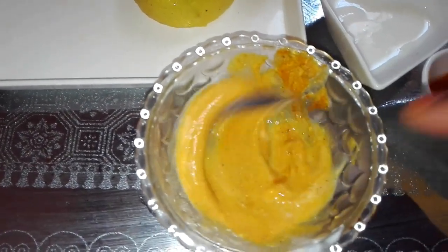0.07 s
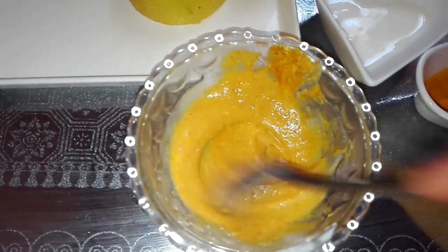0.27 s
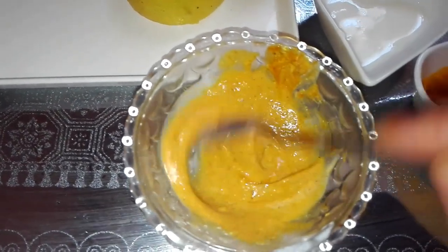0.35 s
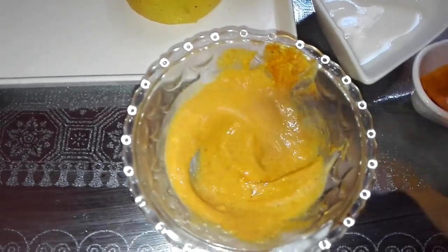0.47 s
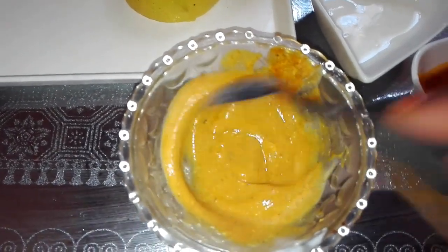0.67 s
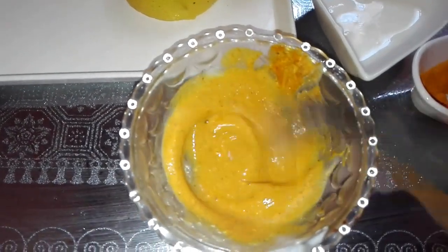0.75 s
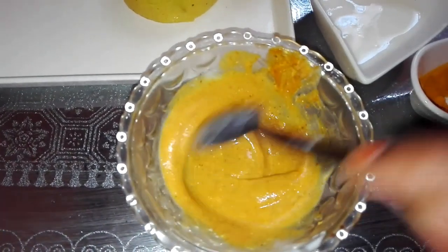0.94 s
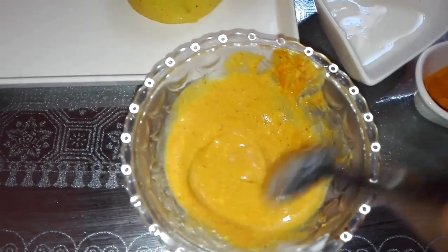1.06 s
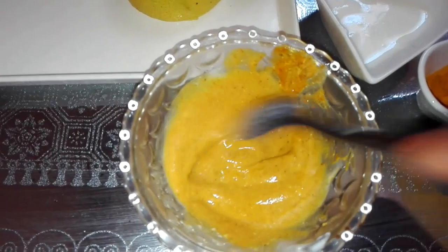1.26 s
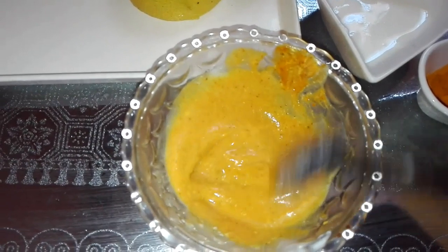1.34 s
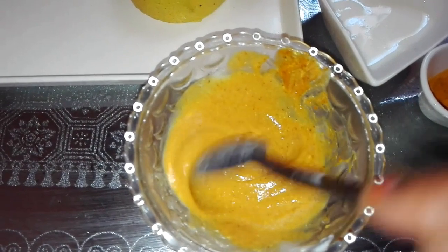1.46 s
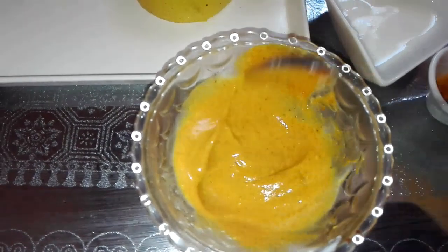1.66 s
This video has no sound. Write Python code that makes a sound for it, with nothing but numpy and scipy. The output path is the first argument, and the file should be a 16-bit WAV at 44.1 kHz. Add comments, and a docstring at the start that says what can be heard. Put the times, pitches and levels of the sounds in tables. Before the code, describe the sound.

A metal spoon stirs thick paste in a glass bowl, with damped clicks and scrapes.

```python
"""A metal spoon stirs thick paste in a small glass bowl, about three and a half turns a second.
It knocks on the glass, which the paste damps at once, stutters along the wall and rings faintly
as it springs free. The paste smears under the spoon and smacks as air pockets open.
A small hard room answers each click. Behind it the bowl rocks on the table, over a faint mains hum."""
import sys
import numpy as np
from scipy import signal
from scipy.io import wavfile

SR = 44100
rng = np.random.default_rng(int(sys.argv[2]) if len(sys.argv) > 2 else 0)


def file_out(sig):
    """Save sig as 16-bit WAV at sys.argv[1]."""
    # one column per channel
    cols = np.atleast_2d(sig).T
    # limit, then scale
    lim = np.clip(cols, -1, 1)
    pcm = np.round(lim * 32767).astype(np.int16)
    wavfile.write(sys.argv[1], SR, pcm)


N = 74970

# A t60 is the time a sound takes to fade by 60 dB. A colour says which pitches are strong or weak.
# the spoon hits the glass: start_s, relative_db, body_db, clink_db, edge_db, thump_db, favoured_hz, lift_db
KNOCK_EVENTS = [(0.4393, -17.5, 2.5, 1, 4.5, 5, 4900, -2.5), (0.5675, -31.5, 3, 4.5, 6.5, 16, 5160, 2.5),
                (0.7297, -15.5, -4.5, -0.5, 2.5, -12, 2260, -1), (1.0191, -25, 2.5, 8.5, 5, 24, 3400, 16),
                (1.2983, -25.5, -3, 1, -5, 16.5, 3920, 18.5), (1.4245, -25, -3.5, 4, 6, 3, 4400, 4)]
# the spoon slips along the wall: start_s, length_s, relative_db, body_db, edge_db
SLIP_EVENTS = [(.0045, 0.0022, -41, 5, 3.5), (.063, 0.0031, -47.5, -23, 4), (.091, 0.0045, -44.5, 7.5, -5),
               (0.132, 0.0045, -43.5, -0.5, -2), (0.2006, 0.0056, -42.5, -9, 6.5),
               (0.2122, 0.0077, -36, 11.5, 10.5), (0.255, 0.0036, -34.5, -9, 6),
               (.275, 0.0034, -35.5, 12.5, 10.5), (0.4473, 0.0044, -33, 2.5, 1.5),
               (0.459, 0.0096, -36.5, -6, 10), (0.4628, 0.0052, -43, 23, -12),
               (0.471, 0.0052, -44.5, 22, 11), (0.5465, 0.0084, -36.5, 6, 1),
               (0.6488, 0.0074, -43, 20.5, 8), (0.7395, 0.0093, -28, 0.5, -4),
               (0.7556, 0.007, -42.5, 13, 7.5), (0.771, 0.0074, -44, 10.5, 14), (0.794, 0.003, -40, 12, 4),
               (0.8077, 0.0011, -40, 17.5, 4.5), (0.842, 0.00044, -43.5, 13, 8),
               (0.86, 0.0013, -42.5, -3, 15), (0.8961, 0.0053, -38.5, 3, 3), (0.912, 0.0034, -42.5, 6.5, 0),
               (1.012, 0.0025, -28.5, -1.5, -8), (1.143, 0.0093, -29, -11, -21),
               (1.1568, 0.0029, -37, 1, -6.5), (1.1739, 0.0017, -33.5, -4, 1.5),
               (1.316, 0.0053, -29.5, -4, -3.5), (1.3302, 0.0063, -30, 6, -0.5),
               (1.3412, 0.0045, -32, -6, -0.5), (1.3568, 0.0067, -41.5, -7, 3),
               (1.389, .007, -42, 2.5, 0.5), (1.411, 0.0068, -28, 2, -5), (1.432, 0.0057, -36, -17.5, 2.5)]
# the spoon springs free: start_s, level_db
SPOON_RELEASES = [(.133, -55), (.149, -49), (0.569, -53)]
# ringing tones of the spoon: pitch_hz, relative_db, t60_s
SPOON_TONES = [(1750, 0, 0.14), (4215, 2.5, 0.15), (7700, -1, 0.041), (11900, -13.5, .09)]
# ringing tones of the filled bowl: pitch_hz, relative_db, t60_s
BOWL_TONES = [(830, -17, 0.028), (1208, -9, 0.018), (1610, -12.5, 0.049), (1841, -5.5, 0.035),
              (2203, 3, 0.012), (2602, -3.5, 0.016), (3475, -2, 0.015), (4050, -2, 0.0037),
              (4812, -3.5, 0.016), (6120, -12.5, 0.014), (6680, -7, 0.0032)]
# colour of the gritty crack in each contact: pitch_hz, gain_db
CRACK_COLOUR = [(120, -31), (500, -15), (1000, 0.5), (3000, -0.5), (6800, -7.5), (8300, -20), (16000, -28)]
# colour of the whole bowl's thump: pitch_hz, gain_db
BOWL_THUMP_COLOUR = [(90, -14), (300, 14.5)]
# air pockets open in the paste: start_s, relative_db
SMACK_EVENTS = [(0.401, -42.5), (0.6859, -46.5), (0.96, -39.5), (1.1844, -34.5), (1.232, -40), (1.636, -40),
                (1.6941, -30)]
# colour of their pops: pitch_hz, gain_db
SMACK_COLOUR = [(550, 1), (1000, 10), (8000, -10.5)]
# paste dragged under the spoon: time_s, level_db
DRAG_LEVELS = [(0, -50.5), (.17, -62.5), (.24, -47.5), (.32, -50.5), (.38, -73), (.43, -63.5), (.47, -40.5),
               (.62, -85), (.68, -43.5), (.72, -63.5), (.77, -44.5), (.94, -59), (1.09, -62.5),
               (1.15, -49.5), (1.28, -80), (1.32, -54), (1.41, -46), (1.48, -82.5), (1.62, -82.5),
               (1.67, -55)]
# colour of the smearing paste: pitch_hz, gain_db
SMEAR_COLOUR = [(200, -7), (400, -2.5), (600, -7.5), (1100, 2.5), (2000, 2.5), (2900, -1.5), (3450, 0.5),
                (4300, -8), (6500, -17), (15000, -32.5)]
# the bowl rocks on the table: time_s, level_db
ROCKING_LEVELS = [(.41, -91), (.445, -48.5), (.62, -82), (.78, -62), (.92, -58.5), (1.17, -54),
                  (1.35, -54.5), (1.5, -80)]
# colour of the table's rumble: pitch_hz, gain_db
RUMBLE_COLOUR = [(35, -21.5), (62, 16), (90, -6), (170, 5.5), (210, -20), (380, -8), (1500, -75)]
# how long the room rings: pitch_hz, t60_s
ROOM_FADE_TIMES = [(700, 0.17), (1700, 0.3353), (3500, 0.2), (9000, 0.4)]
# how much sound the room sends back: pitch_hz, gain_db
ROOM_COLOUR = [(600, -0.5), (1200, -4.5), (2000, -11.5), (2900, -9), (3400, -13), (4200, -20.5)]
# echoes from nearby surfaces: delay_s, gain
NEAR_ECHOES = [(.0019, 0.1), (.0034, 0.062)]
# colour of the room's still air: pitch_hz, gain_db
AIR_COLOUR = [(30, -3.5), (70, 10), (150, 5), (260, -12), (1000, -19.5), (3000, -26), (15000, -29)]

KNOCK_BOOST_DB, SLIP_BOOST_DB, SMACK_BOOST_DB = 23.5, 23.5, 19
THUMP_HZ, THUMP_T60_S, THUMP_DB = 390, 0.015, -39
CRACK_T60_S, CRACK_DB = 0.016, -1.5
BODY_HZ, NEUTRAL_HZ, CLINK_HZ, EDGE_HZ, FAVOUR_OCTAVES = 1082, 2020, 3330, 4500, 0.24
CATCHES_PER_S, SLIP_ENDS_DB = 5000, -0.5  # a slip is a little weaker at both ends
SLIP_CLINK_DB, CLINK_PER_EDGE = 7.5, 0.63  # a sharper slip also clinks more
POP_HZ, POP_PITCH_SPREAD, POP_T60_S, SMACK_DECAY_S = 1300, 0.44, 0.0033, 0.008
GRAINS_PER_S, GRAIN_SPREAD_DB = 14000, 3.5
FIZZ_HZ, FIZZ_FULL_DB, FIZZ_SLOPE = 3870, -54.5, 0.33  # the fizz grows faster than the drag
HUM_HZ, HUM_DB, AIR_DB = 51, -60, -67
ROOM_BUILD_S, CUTOFF_HZ = 0.0025, 16200


def knocks():
    """The spoon hits the glass hard, each time with a dull thump of the whole bowl."""
    out = np.zeros(N)
    thump = amp(THUMP_DB) * unit(colour(ring([(THUMP_HZ, 0, THUMP_T60_S)]), BOWL_THUMP_COLOUR))
    for start_s, db, body_db, clink_db, edge_db, thump_db, favoured_hz, lift_db in KNOCK_EVENTS:
        touch = glass(body_db, clink_db, edge_db, favoured_hz, lift_db)
        add(out, start_s, amp(db + KNOCK_BOOST_DB) * (touch + amp(thump_db) * thump))
    return out


def glass(body_db, clink_db, edge_db, favoured_hz=NEUTRAL_HZ, lift_db=0, size=4096):
    """One touch: a short ring and a crack. The spot touched sets the colour and favours some tones."""
    t = np.arange(size) / SR
    tones = np.zeros(size)
    for k, (hz, db, t60) in enumerate(BOWL_TONES):
        closeness = np.exp(-(np.log2(hz / favoured_hz) / FAVOUR_OCTAVES) ** 2)
        tones += (-1) ** k * ring([(hz, db + lift_db * closeness, t60)], size)  # every other tone flips
    crack = colour(rng.standard_normal(size) * dying(t, CRACK_T60_S), CRACK_COLOUR)
    touch = unit(unit(tones) + amp(CRACK_DB) * unit(crack))
    spot = [(BODY_HZ / 2, 0), (BODY_HZ, body_db), (NEUTRAL_HZ, 0), (CLINK_HZ, clink_db), (EDGE_HZ, edge_db)]
    return colour(touch, spot)


def slips():
    """Short scrapes: the spoon catches on the wall many times in a row, and each catch rings the glass."""
    out = np.zeros(N)
    t = np.arange(1024) / SR
    for start_s, length_s, db, body_db, edge_db in SLIP_EVENTS:
        catches = random_clicks(len(t), CATCHES_PER_S) * (t < length_s)
        catches[0] = 1  # the first touch
        soft_ends = amp(SLIP_ENDS_DB * (2 * np.minimum(t / length_s, 1) - 1) ** 2)
        touch = glass(body_db, SLIP_CLINK_DB + CLINK_PER_EDGE * edge_db, edge_db)
        scrape = signal.fftconvolve(touch, catches * soft_ends)
        add(out, start_s, amp(db + SLIP_BOOST_DB) * np.linalg.norm(touch) * unit(scrape))
    return out


def spoon_ring():
    """The spoon rings thinly when it leaves the glass."""
    out = np.zeros(N)
    for start_s, db in SPOON_RELEASES:
        add(out, start_s, amp(db) * ring(SPOON_TONES, size=16384))
    return out


def smacks(count=32, size=4096):
    """Air pockets open in the paste: each is a bunch of tiny, very short pops around one pitch."""
    out = np.zeros(N)
    for start_s, db in SMACK_EVENTS:
        delays = SMACK_DECAY_S * rng.exponential(1, count)
        pitches = POP_HZ * np.exp(POP_PITCH_SPREAD * rng.standard_normal(count))
        strengths = rng.standard_normal(count)
        pops = np.zeros(size)
        for delay_s, hz, strength in zip(delays - delays.min(), pitches, strengths):
            add(pops, delay_s, strength * ring([(hz, 0, POP_T60_S)], size=1024))
        add(out, start_s, amp(db + SMACK_BOOST_DB) * unit(colour(pops, SMACK_COLOUR)))
    return out


def smear():
    """Dragged paste makes countless wet clicks: dull when the spoon glides, fizzy when it presses."""
    grains = random_clicks(N, GRAINS_PER_S)
    grains *= amp(GRAIN_SPREAD_DB * np.minimum(rng.exponential(1, N), 3))  # a few stand out
    wet = steady(colour(grains, SMEAR_COLOUR))
    drag = level(DRAG_LEVELS)
    fizz = signal.sosfiltfilt(signal.butter(2, FIZZ_HZ, "high", fs=SR, output="sos"), wet)
    fizz_gain = (drag / amp(FIZZ_FULL_DB)) ** FIZZ_SLOPE
    return drag * (wet - fizz + fizz * fizz_gain)


def room(x):
    """Hard walls send the sound back: a few close echoes and a short, blurred tail."""
    t = np.arange(SR // 2) / SR
    hz, frame_s, spectrum = signal.stft(rng.standard_normal(len(t)), SR, nperseg=256)
    fade = dying(frame_s, read(ROOM_FADE_TIMES, hz)[:, None])  # each pitch fades at its own speed
    tail = signal.istft(spectrum * fade, SR, nperseg=256)[1][:len(t)]
    response = colour(unit(tail * np.minimum(t / ROOM_BUILD_S, 1)), ROOM_COLOUR)
    response[0] += 1  # the direct sound
    for delay_s, gain in NEAR_ECHOES:
        add(response, delay_s, np.array([gain]))
    return signal.fftconvolve(x, response)[:N]


def background():
    """The table rumbles under the rocking bowl, over mains hum and still air."""
    rumble = steady(colour(rng.standard_normal(N), RUMBLE_COLOUR)) * level(ROCKING_LEVELS)
    hum = amp(HUM_DB) * steady(np.sin(2 * np.pi * (HUM_HZ * np.arange(N) / SR + rng.random())))
    air = amp(AIR_DB) * steady(colour(rng.standard_normal(N), AIR_COLOUR))
    return rumble + hum + air


def amp(db):
    """Turns decibels into a gain."""
    return 10 ** (np.asarray(db) / 20)


def unit(x):
    """Scales a sound to a total energy of one."""
    return x / np.sqrt(np.sum(x ** 2) + 1e-20)


def steady(x):
    """Scales a sound to an average power of one."""
    return unit(x) * np.sqrt(len(x))


def read(points, hz):
    """Looks up a table's value at any pitch."""
    pitches, values = np.transpose(points)
    return np.interp(np.log(hz + 1), np.log(pitches), values)


def level(points):
    """Gain over time from rows of time_s, level_db."""
    return amp(np.interp(np.arange(N) / SR, *np.transpose(points)))


def add(mix, start_s, sound):
    """Mixes a sound in at a given time."""
    part = mix[max(round(start_s * SR), 0):][:len(sound)]
    part += sound[:len(part)]


def colour(x, points, size=4096):
    """Turns pitches up or down by rows of pitch_hz, gain_db."""
    log_gain = np.log(amp(read(points, abs(np.fft.fftfreq(size, 1 / SR)))))
    taps = np.fft.ifft(np.exp(np.conj(signal.hilbert(log_gain)))).real  # rings only after a click
    return signal.fftconvolve(x, taps[:size // 2])[:len(x)]


def dying(t, t60):
    """A fade that drops 60 dB every t60 seconds."""
    return np.exp(-np.log(1000) * t / t60)


def ring(tones, size=4096):
    """The fading tones of something struck."""
    t = np.arange(size) / SR
    return sum(amp(db) * dying(t, t60) * np.sin(2 * np.pi * hz * t) for hz, db, t60 in tones)


def random_clicks(size, per_s):
    """Clicks of random strength at random times."""
    return rng.standard_normal(size) * (rng.random(size) < per_s / SR)


def scene():
    """Spoon, bowl and paste in the room, as one channel."""
    stirring = knocks() + slips() + spoon_ring() + smacks() + smear()
    return (room(stirring) + background())[None]


def record(dry):
    """Cuts away the very highest treble."""
    low_pass = signal.firwin(255, CUTOFF_HZ, window=("kaiser", 8), fs=SR)
    return signal.oaconvolve(dry, low_pass[None], "same")


dry = scene()
out = record(dry)
file_out(out)
```